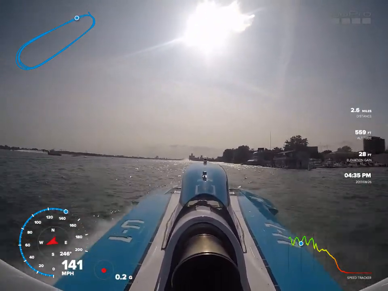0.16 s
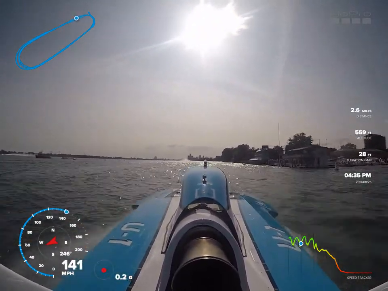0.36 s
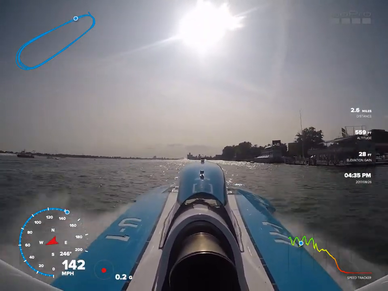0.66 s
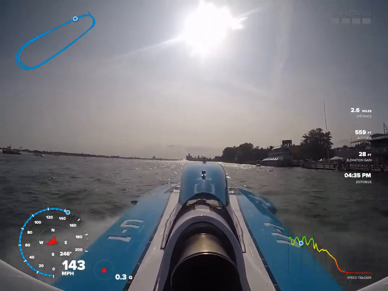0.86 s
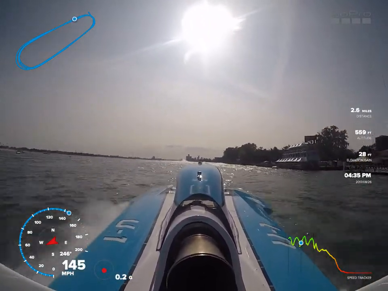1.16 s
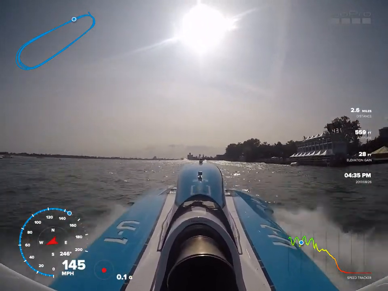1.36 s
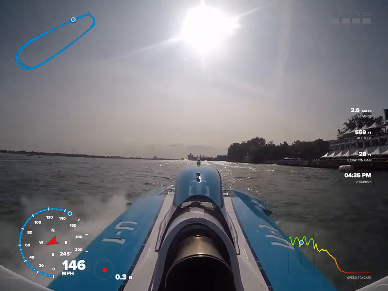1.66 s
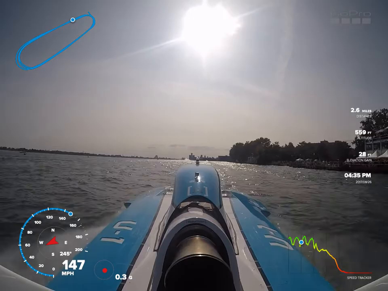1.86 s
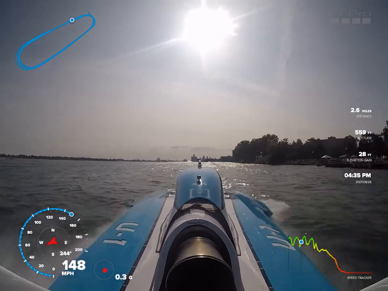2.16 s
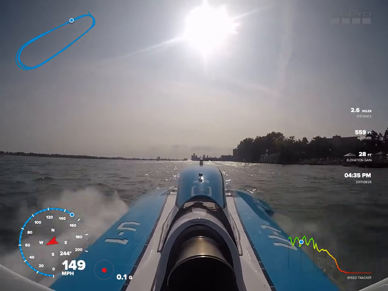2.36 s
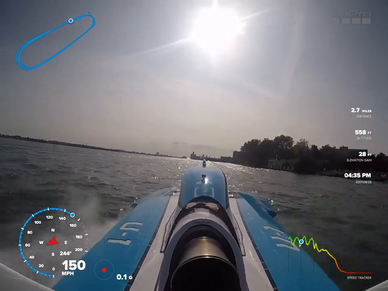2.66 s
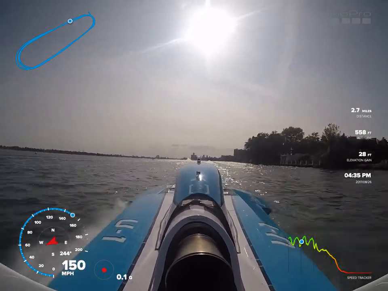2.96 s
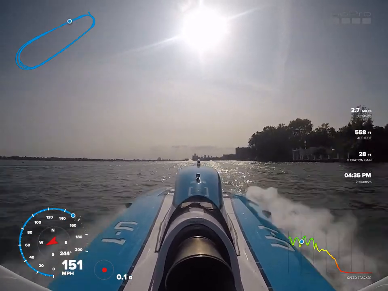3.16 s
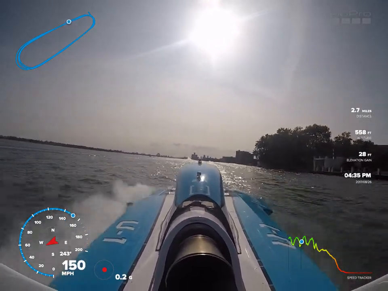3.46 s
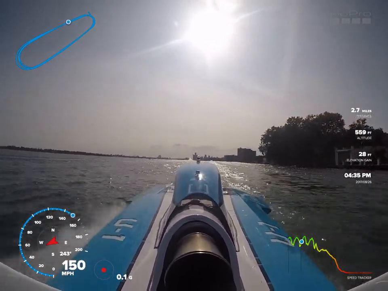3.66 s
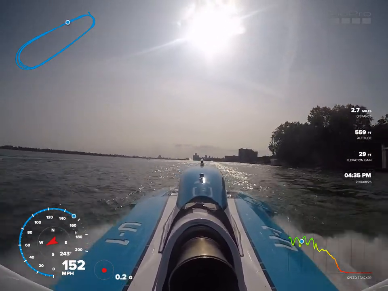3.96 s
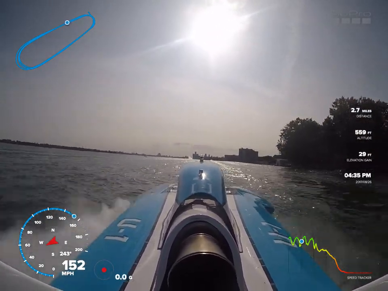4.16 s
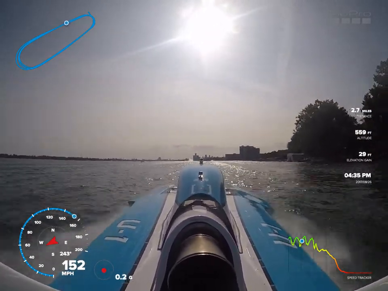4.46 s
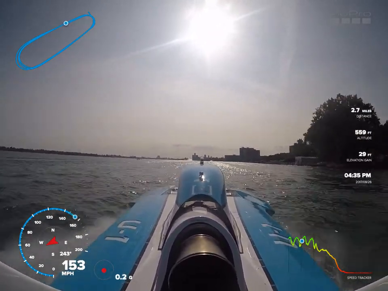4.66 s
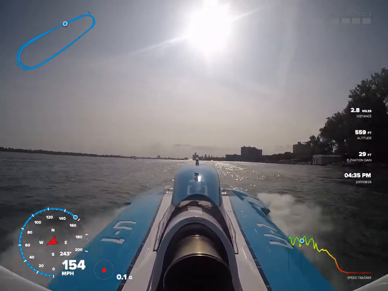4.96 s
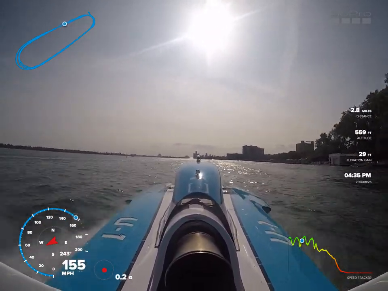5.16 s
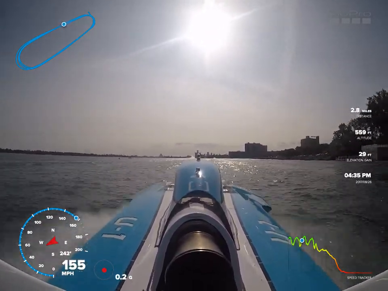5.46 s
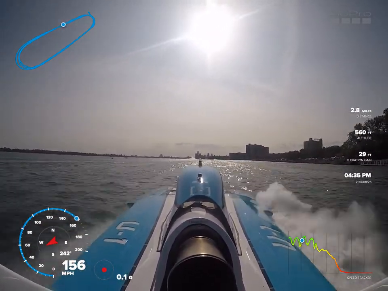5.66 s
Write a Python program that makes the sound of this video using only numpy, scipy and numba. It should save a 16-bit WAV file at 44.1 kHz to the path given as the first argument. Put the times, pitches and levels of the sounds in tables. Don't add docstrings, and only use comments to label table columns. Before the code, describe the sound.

Heard from a camera in a sealed housing bolted to a speeding turbine race boat on open water: a continuous deep, wobbling hull boom dominates, with spray rushing over it, loose fittings rattling and a faint jet hiss on top. Small dull knocks come irregularly. Around 2.6 seconds the boat leaps briefly and the roar thins, then it slams down and continues at the same pinned loudness.

```python
import sys
import numpy as np
from scipy import signal
from scipy.fft import rfft, irfft, next_fast_len
from scipy.io import wavfile
from scipy.ndimage import uniform_filter1d, minimum_filter1d
from numba import njit

SR = 44100
rng = np.random.default_rng(int(sys.argv[2]) if len(sys.argv) > 2 else 0)


def materialize(psi):
    bounded = np.clip(np.atleast_2d(psi).T, -1, 1)
    quanta = np.round(bounded * 32767).astype(np.int16)
    wavfile.write(sys.argv[1], SR, quanta)


def gain_from_db(level_db):
    decades = np.asarray(level_db, float) / 20
    return 10 ** decades


N = 256220

# frequency in Hz, width in Hz, level in dB, sign of the motion.
HULL_MODES = [(41, 17, -6.5, 1), (84.7, 48.6, 1, 1), (209, 180, -3.5, -1), (270.7, 41, 3, 1),
              (311, 38, -1, 1)]
# frequency in Hz, width in Hz, level in dB, sign of the motion.
HOUSING_MODES = [(1280, 320, -4.5, 1), (1513, 133, -0.5, -1), (1803, 154, -2.5, 1), (2087, 290, -9.5, -1),
                 (3400, 1300, -17.5, 1), (5500, 4600, -22, -1), (9100, 6800, -28.5, 1)]
# frequency in Hz, level in dB.
WASH_COLOUR = [(300, -33), (450, -4), (520, -5.5), (600, -7), (680, -4), (900, -8), (1080, -10), (1200, -6),
               (1350, -15), (1700, -25.5), (2600, -60)]
# frequency in Hz, level in dB.
EXHAUST_COLOUR = [(1800, -18.5), (2300, -9.5), (2600, -11), (3100, -2), (3550, 2), (4200, -8),
                  (4800, -10.5), (5600, -8.5), (6800, -19), (9000, -26), (10200, -31.5), (11200, -51),
                  (12300, -65.5)]
# start in seconds, peak level in dB, brightness in dB.
KNOCKS = [(0.2238, -23.5, -28), (0.2837, -15, -24), (0.431, -17, -36), (0.5357, -17.5, -33),
          (0.6862, -37, -19), (1.59, -23, -19), (2.1574, -25.5, -28.5), (2.2165, -25, -18),
          (2.2711, -24, -22), (2.5173, -19, -22), (2.5707, -25, -17), (2.6986, -36, -9), (2.7555, -17, -30),
          (2.822, -17.5, -32), (3.1604, -21, -27), (3.4275, -25, -22), (3.659, -26, -31), (3.8344, -26, -9),
          (3.9685, -20, -19), (4.5498, -26, -30), (4.595, -24, -21.5), (4.715, -18.5, -23),
          (4.779, -26.5, -25), (4.9457, -30, -12), (5.1736, -25, -10), (5.2728, -30, -22),
          (5.3632, -16, -11), (5.4912, -19.5, -23), (5.5744, -25, -13), (5.7862, -15.5, -27)]
# start in seconds, length in seconds, start pitch in Hz, end pitch in Hz, level in dB.
AIR_SLAPS = [(.27, 0.058, 454, 528, -30), (.35, 0.075, 470, 488, -28), (.74, 0.08, 417, 446, -34),
             (2.695, 0.06, 470, 538, -29.5), (2.77, 0.095, 424, 473, -26.5), (2.9, 0.066, 523, 560, -42.5),
             (3.46, 0.064, 429.7, 458.6, -40), (4.5, 0.07, 412, 482, -36), (5.28, 0.14, 408, 452, -25),
             (5.36, .06, 480, 535, -38.5), (5.72, 0.08, 421, 440, -24.5)]
# time in seconds, nose-up in dB favouring keel over deck, sponson wetting in dB.
ATTITUDE = [(0, 0, -0.5), (.13, 4.5, 6), (.36, -2, -14), (.5, -10, -1), (.7, 1, 1.5), (.92, -4.5, 0),
            (1.36, 6.5, 2), (1.54, -2, 4), (2.0, -4, 3), (2.2, 3, 1), (3.24, 3, -4.5), (3.4, 1.5, 0),
            (3.56, 4, 3), (3.92, 1.5, -2), (4.15, -2.5, 1), (5.05, 2.5, -1), (5.3, 4, 7), (5.55, 2.5, 0)]
# mean pitch in Hz, mean level in dB, pitch wander in Hz, level wander in dB.
BOOM_MODES = [
    (134.3, -18.5, 2.404, -0.5),
    (302.5, -21.5, 5.06, 2),
    (392.2, -33.5, 10.17, 2),
]
BOOM_WIDTH_HZ = [
    26.6,
    66.7,
    32,
]
NOSE_SHARE = [
    0.51,
    -0.52,
    0,
]
# time in seconds, pitch in Hz.
KEEL_HZ = [(0.0, 139.8), (0.52, 130.8), (0.64, 121.2), (0.95, 146.7), (1.08, 119), (1.18, 141.2),
           (1.47, 125.9), (1.63, 143.7), (1.99, 123.6), (2.02, 135.3), (2.49, 125.2), (2.67, 143.8),
           (3.52, 122.0), (3.68, 137.3), (4.64, 138.2), (4.7, 127.4), (5.3, 144.1), (5.8, 136.9)]
# time in seconds, pitch in Hz.
DECK_HZ = [(0.0, 325.6), (0.06, 298), (1.16, 297.5), (1.31, 323.7), (1.78, 278.8), (1.94, 313.4),
           (2.12, 279.1), (2.26, 324.8), (2.39, 278.5), (2.45, 321.8), (2.76, 280.3), (2.86, 318.1),
           (3.63, 298.7), (3.78, 325.1), (3.89, 278.9), (4.18, 329.7), (4.3, 301), (5.8, 294.6)]
# start in seconds, length in seconds, spray in dB.
LANDINGS = [(.07, 0.039, 4), (.27, .19, 5.5), (.84, .1, 2.5), (1.56, .12, 2.5), (2.04, 0.043, 5.5),
            (2.14, 0.21, 1.5), (2.38, 0.036, 5.5), (2.695, 0.16, 4.5), (2.805, .05, 5.5), (3.05, 0.08, 3),
            (3.75, 0.085, 1), (4.05, .1, 1), (4.36, 0.28, 2), (4.74, 0.22, 1.5), (5.18, 0.29, 4),
            (5.33, 0.057, 4), (5.74, .1, 5.5)]
# start in seconds, length in seconds, spray in dB.
HOPS = [(.02, 0.018, -7), (.98, 0.11, -4), (1.15, 0.026, -4), (1.69, 0.054, -1), (1.9, 0.079, -7.5),
        (2.47, .03, -2), (2.59, 0.048, -2), (2.95, 0.037, -5.5), (3.2, 0.041, -6), (3.97, 0.068, -3),
        (4.24, 0.065, -4.5), (4.98, 0.018, -13), (5.6, 0.026, -3)]
# start in seconds, length in seconds, share of the leap change.
LEAP = [
    (2.593, .103, 1),
]
LEAP_MODE_DB = [
    -4.5,
    -1.5,
    -15,
]
LEAP_LAYER_DB = [
    -7,
    -16,
    -4,
    2.5,
]


def unit(x):
    return x / np.sqrt(np.mean(x ** 2))


def through(x, response):
    size = next_fast_len(N + SR // 2)
    hz = np.arange(1, size // 2 + 2) * SR / size
    return irfft(rfft(x, size) * response(hz), size)[:N]


def ring(x, modes):
    def response(f):
        return sum(np.sign(sign) * gain_from_db(db) * hz * width / (hz ** 2 - f ** 2 + 1j * f * width)
                   for hz, width, db, sign in modes)
    return through(x, response)


def colour(x, points):
    hz, db = np.transpose(points)
    return through(x, lambda f: gain_from_db(np.interp(np.log(f), np.log(hz), db, left=-90, right=-90)))


def wall(x, hz, order):
    return through(x, lambda f: 1 / (1 + 1j * f / hz) ** order)


def walk(rate):
    hold = int(SR / rate)
    steps = np.repeat(rng.standard_normal(N // hold + 1), hold)[:N]
    return unit(uniform_filter1d(uniform_filter1d(steps, hold), hold))


def grains(rate, spread_db):
    hit = rng.random(N) < rate / SR
    strength = gain_from_db(spread_db * np.minimum(rng.exponential(size=N), 4.0))
    return unit(hit * np.sign(rng.standard_normal(N)) * strength)


def curves(table):
    s, *columns = np.transpose(table)
    return [np.interp(np.arange(N) / SR, s, column) for column in columns]


def spells(table):
    t = np.arange(N) / SR
    edge_s = 0.012
    return sum(db * np.clip(np.minimum(t - s, s + length - t) / edge_s + 0.5, 0, 1)
               for s, length, db in table)


def ride_db(mean_db, per_landing, per_hop, wander_db, leap_db):
    rides = per_landing * spells(LANDINGS) + per_hop * spells(HOPS) + leap_db * spells(LEAP)
    return mean_db + rides + wander_db * walk(9)


def exhaust(shake):
    level_db = ride_db(-56.5, per_landing=0.5, per_hop=0.5, wander_db=0.7, leap_db=LEAP_LAYER_DB[3])
    level_db = level_db + 0.5 * np.arange(N) / SR
    flicker_db = 0.11 * shake + 0.85 * walk(120) + 1.7 * walk(380)
    gas = rng.standard_normal(N) + 0.8 * grains(500, spread_db=2.0)
    return gain_from_db(level_db) * unit(colour(gain_from_db(flicker_db) * gas, EXHAUST_COLOUR))


def rattle(shake):
    level_db = ride_db(-43.5, per_landing=0.98, per_hop=0.64, wander_db=0.14, leap_db=LEAP_LAYER_DB[2])
    taps = grains(1500, spread_db=3.0) + 0.26 * rng.standard_normal(N)
    ringing = ring(gain_from_db(0.55 * shake) * taps, HOUSING_MODES[1:])
    return gain_from_db(level_db) * unit(wall(ringing, 3500, order=3))


def spray(shake):
    level_db = ride_db(-42.5, per_landing=0.77, per_hop=0.4, wander_db=0.44, leap_db=LEAP_LAYER_DB[1])
    water = gain_from_db(0.5 * shake + 0.25 * walk(70)) * rng.standard_normal(N)
    return gain_from_db(level_db) * unit(colour(water, WASH_COLOUR))


def knocks():
    dull, crack = np.zeros(N), np.zeros(N)
    t = np.arange(400) / SR
    push_s = 0.00008
    for s, db, bright_db in KNOCKS:
        i = int((s + 0.0012) * SR)
        noise = rng.standard_normal(len(t))
        push = t / push_s * np.exp(-t / push_s) + 0.21 * noise * np.exp(-t / 0.00074)
        dull[i:i + len(t)] += gain_from_db(db) * push[:N - i]
        crack[i:i + len(t)] += gain_from_db(db + bright_db) * (noise * np.exp(-t / 0.0039))[:N - i]
    low = gain_from_db(20.5) * ring(dull, HOUSING_MODES[:4])
    high = gain_from_db(23) * wall(ring(crack, HOUSING_MODES[4:]), 10000, order=4)
    return low + high


def air_slaps():
    out = np.zeros(N)
    for s, length, hz0, hz1, db in AIR_SLAPS:
        u = np.clip((np.arange(N) / SR - s) / length, 0, 1)
        cycles = rng.random() + length * (hz0 * u + (hz1 - hz0) * u ** 2 / 2)
        out += gain_from_db(db - 2.0) * np.sin(np.pi * u) * np.sin(2 * np.pi * cycles)
    return out * gain_from_db(2.5 * walk(60))


def sway(hz, width_hz, steady):
    swing = rng.standard_normal(N) + 1j * rng.standard_normal(N)
    pole = np.exp(-np.pi * width_hz / SR)
    swing = signal.lfilter([1], np.poly([pole, pole]), swing)
    swing = swing / np.abs(swing) ** np.clip(steady, 0, 0.9)
    turns = np.cumsum(hz) / SR
    return unit((swing * np.exp(2j * np.pi * turns)).real)


def booms():
    nose_db, wetting_db = curves(ATTITUDE)
    (keel_hz,), (deck_hz,) = curves(KEEL_HZ), curves(DECK_HZ)
    shifts_hz = [0.695 * (keel_hz - keel_hz.mean()), 0.695 * (deck_hz - deck_hz.mean()), 0]
    wets_db = [0, 0, wetting_db]
    out = np.zeros(N)
    for i, (hz, db, wander_hz, wander_db) in enumerate(BOOM_MODES):
        level_db = db - 2.5 + NOSE_SHARE[i] * nose_db + wets_db[i]
        level_db = level_db + LEAP_MODE_DB[i] * spells(LEAP) + wander_db * walk(9)
        pitch_hz = hz + shifts_hz[i] + wander_hz * walk(9)
        out += gain_from_db(level_db) * sway(pitch_hz, BOOM_WIDTH_HZ[i], steady=0.26)
    return out


def pounding():
    level_db = ride_db(-22, per_landing=0.22, per_hop=0.2, wander_db=1, leap_db=LEAP_LAYER_DB[0])
    return gain_from_db(level_db) * unit(wall(ring(rng.standard_normal(N), HULL_MODES), 330, order=3))


def hull():
    node_hz, node_width_hz = 345, 18

    def gap(f, share):
        return node_hz ** 2 - f ** 2 + 1j * f * share * node_width_hz

    shaken = through(booms() + pounding(), lambda f: gap(f, 0.45) / gap(f, 0.63))
    return shaken + air_slaps()


def scene():
    shake = 0.51 * walk(40) + 2.4 * walk(130) + 1.8 * walk(330)
    mix = exhaust(shake) + rattle(shake) + spray(shake) + knocks() + hull()
    return mix[None, :]


@njit
def recover(gain, step):
    out, g = np.empty(len(gain)), 1.
    for i in range(len(gain)):
        g = min(gain[i], g + step * (1 - g))
        out[i] = g
    return out


def limiter(x):
    ceiling, release_s = 0.383, 0.028
    look = int(0.002 * SR)
    need = minimum_filter1d(np.minimum(1, ceiling / (np.abs(x) + 1e-9)), 2 * look + 1)
    gain = recover(need, 1 / (release_s * SR))
    return x * uniform_filter1d(uniform_filter1d(gain, look), look)


def band_limit(x):
    return signal.sosfilt(signal.butter(12, 15500, fs=SR, output="sos"), x)


def record(dry):
    def microphone(f):
        return (1j * f / (36 + 1j * f)) ** 3 / np.sqrt(1 + (f / 10500) ** 16)
    mix = limiter(through(dry[0], microphone) * gain_from_db(5))[None, :]
    return band_limit(mix)


dry = scene()
out = record(dry)
materialize(out)
```